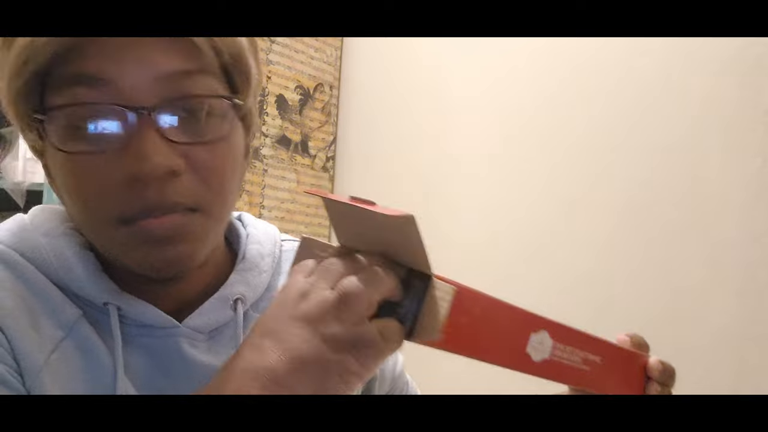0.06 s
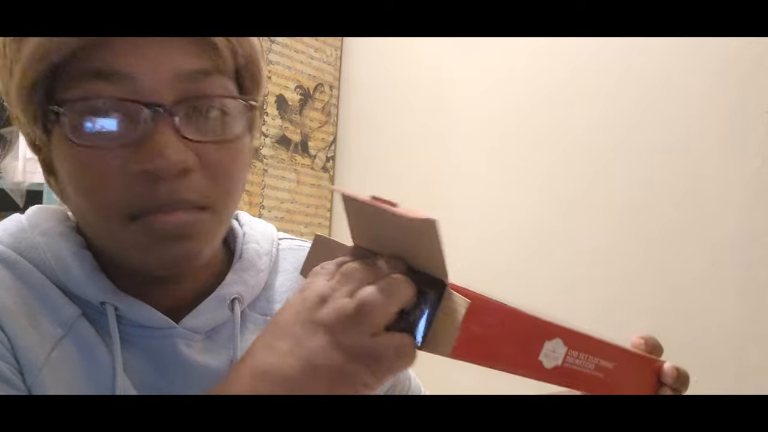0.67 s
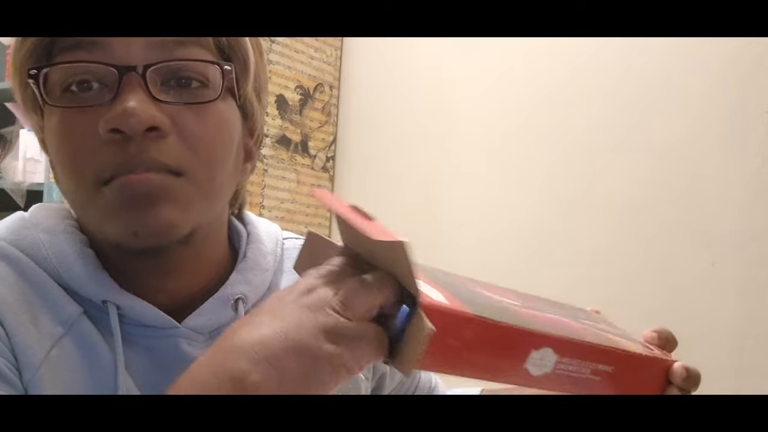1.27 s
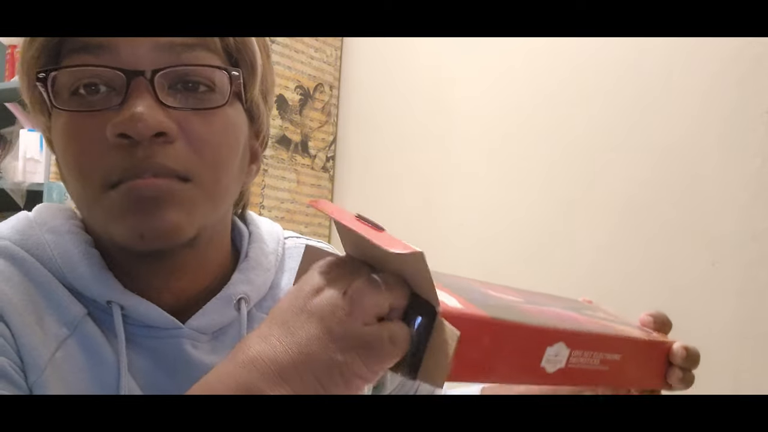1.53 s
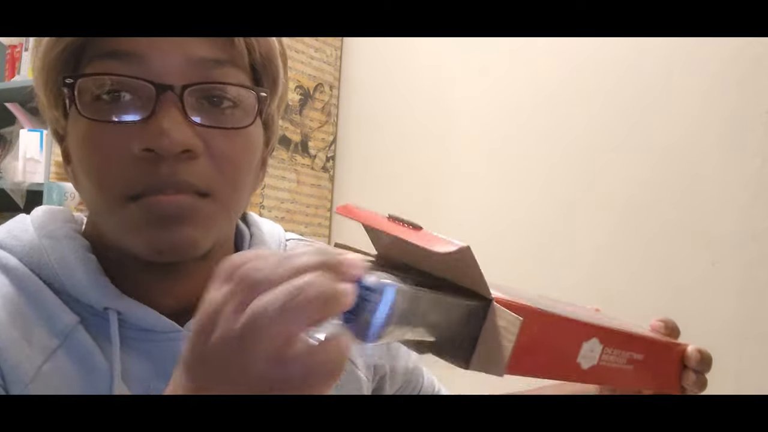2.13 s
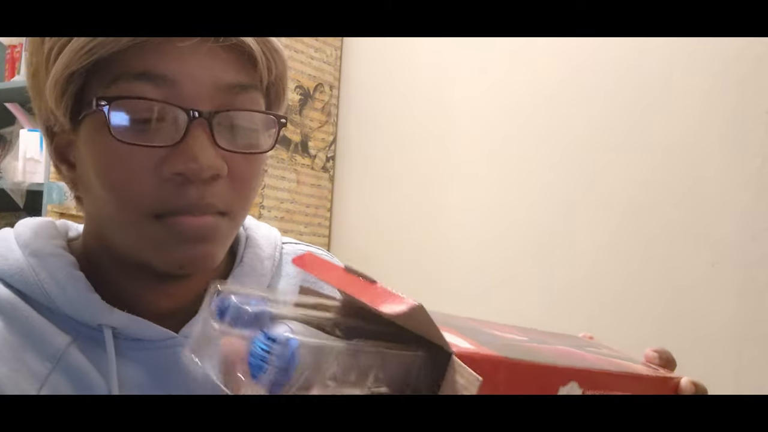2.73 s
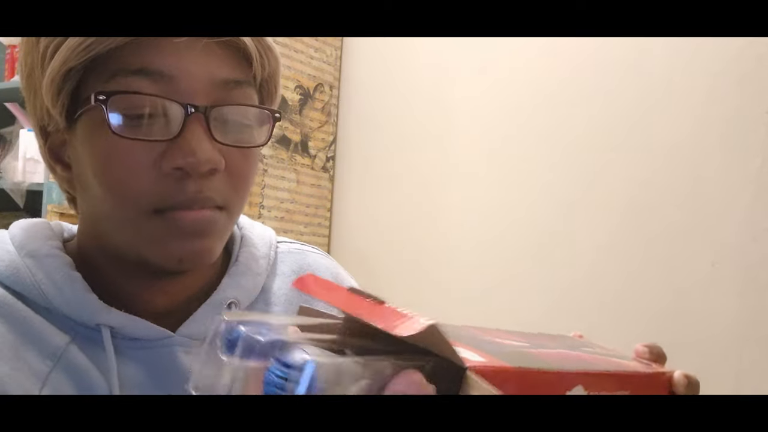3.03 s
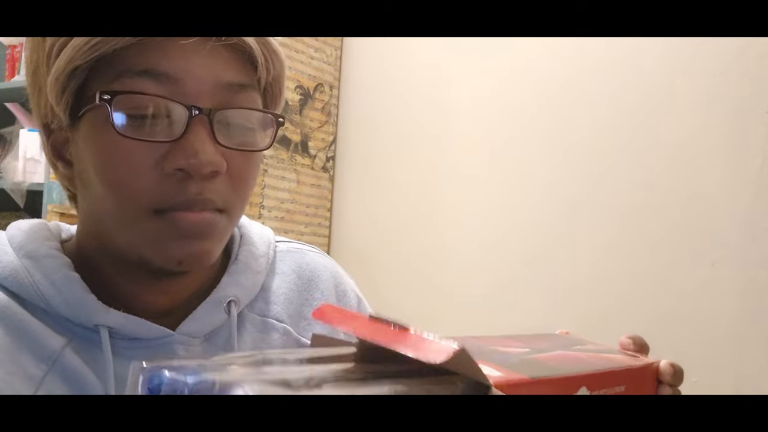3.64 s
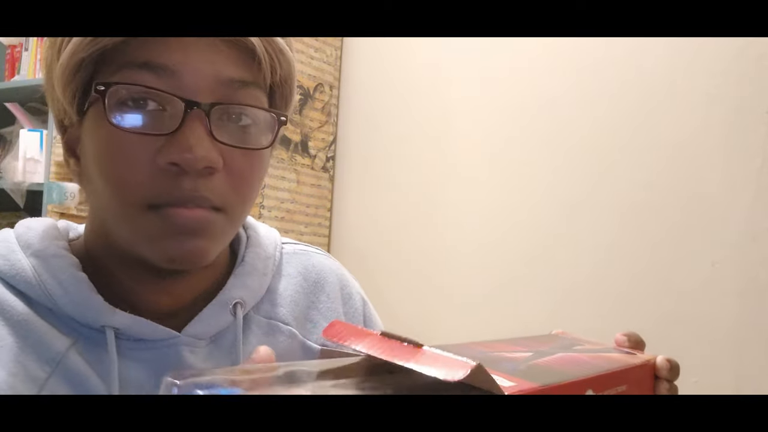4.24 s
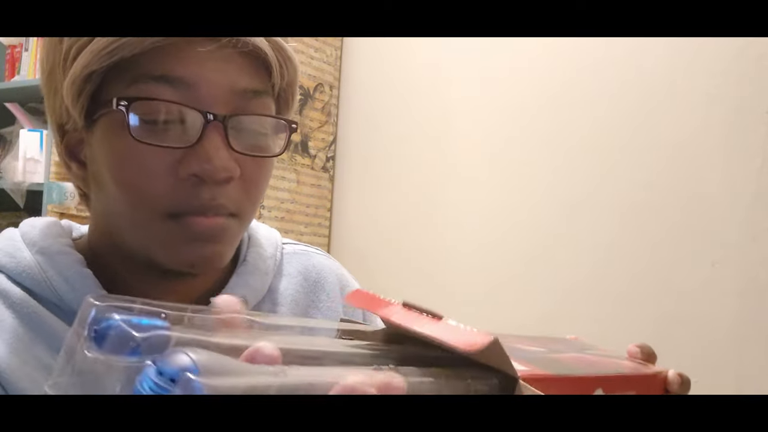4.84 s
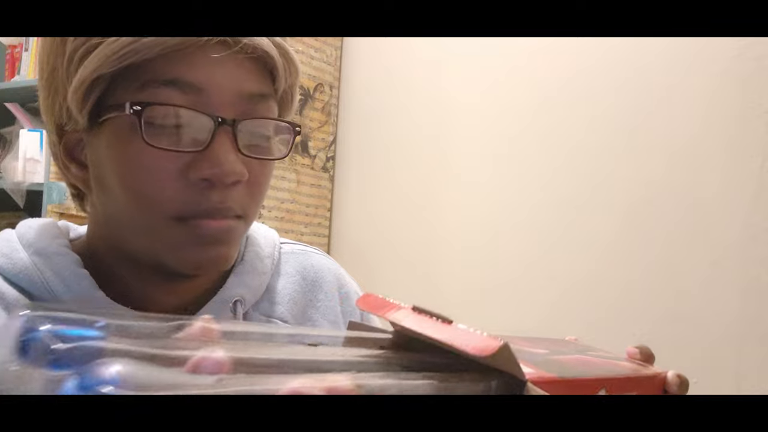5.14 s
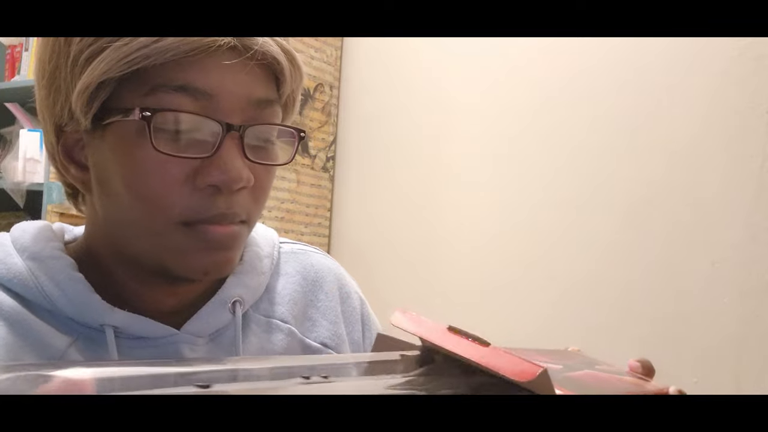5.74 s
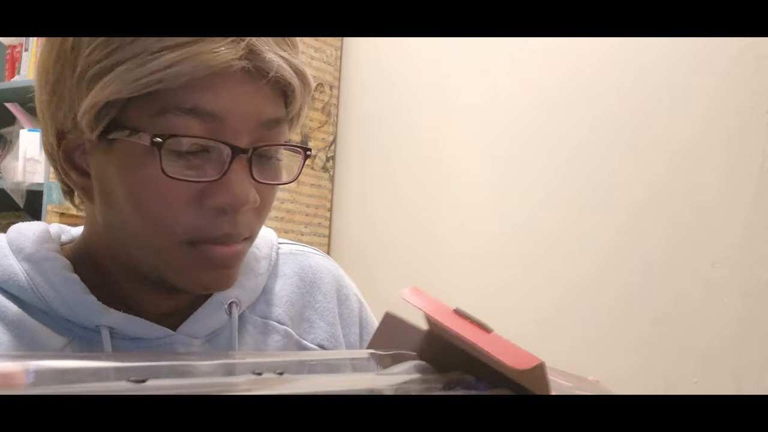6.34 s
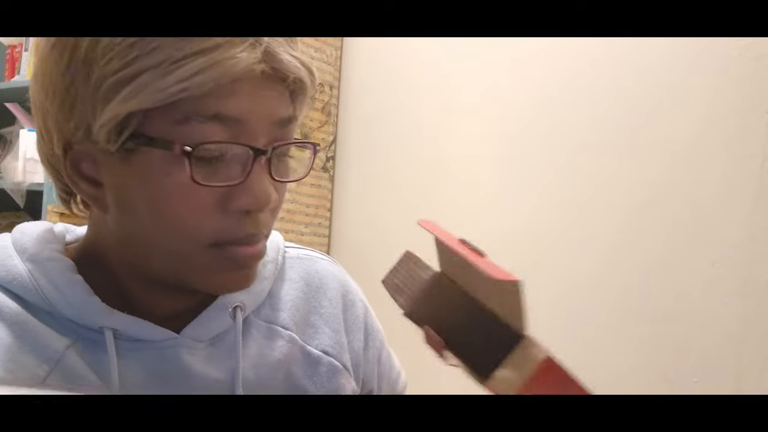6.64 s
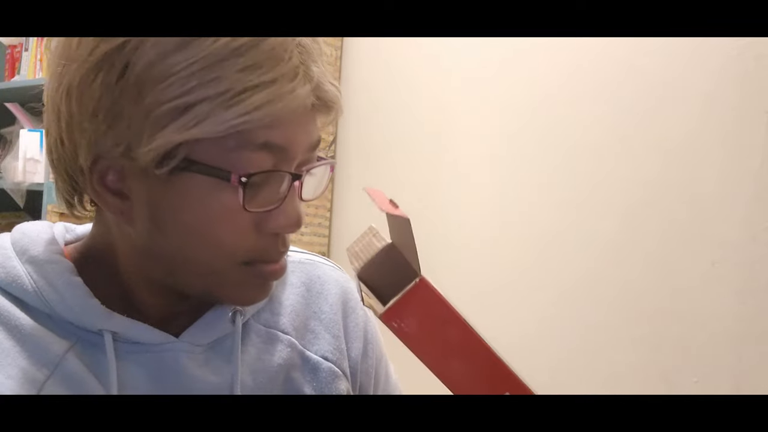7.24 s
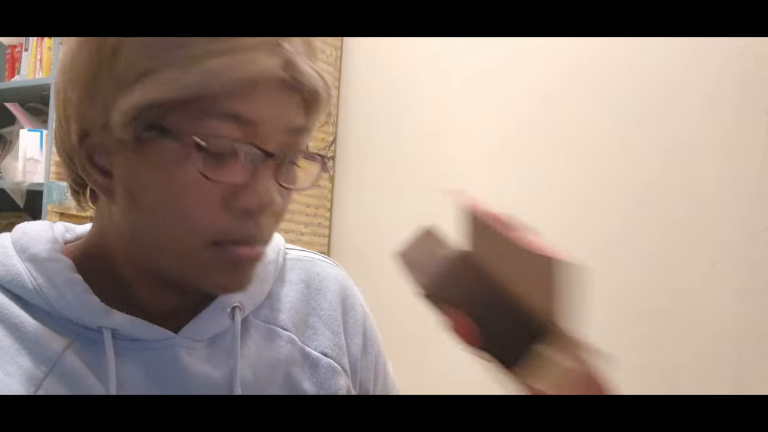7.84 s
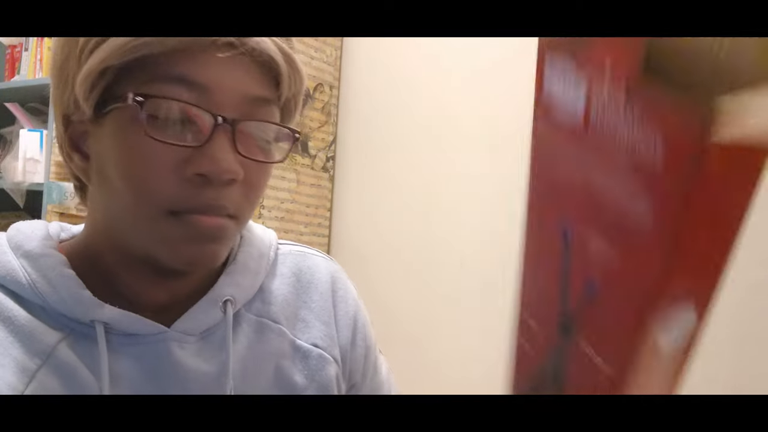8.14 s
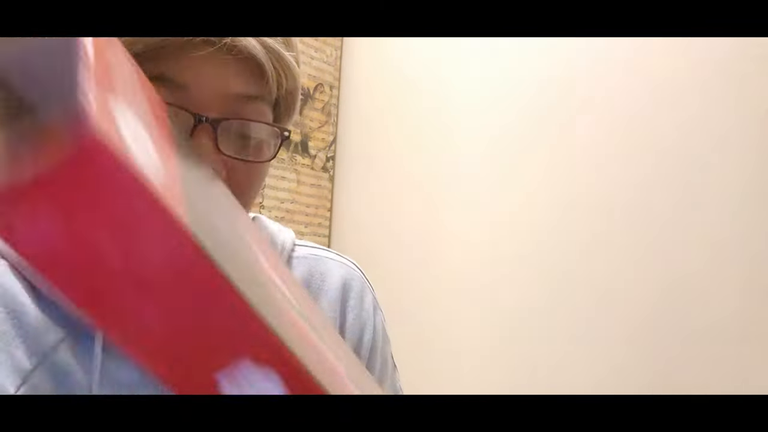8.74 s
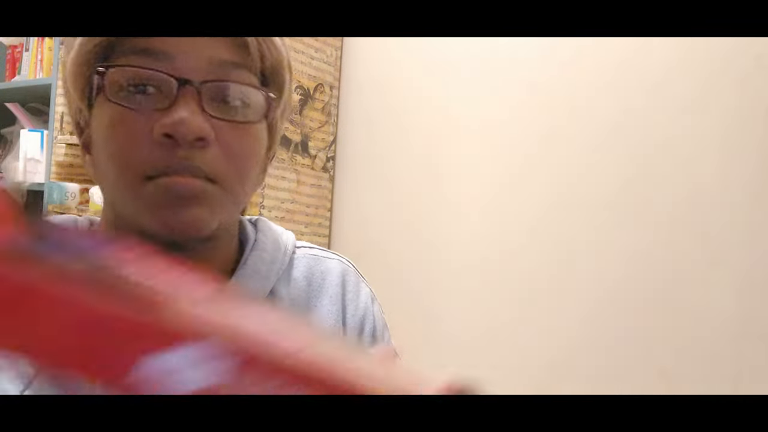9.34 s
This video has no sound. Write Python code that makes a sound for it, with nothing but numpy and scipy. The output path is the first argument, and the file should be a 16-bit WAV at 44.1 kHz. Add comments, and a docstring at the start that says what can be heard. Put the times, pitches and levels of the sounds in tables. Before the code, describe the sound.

A thin plastic tray crinkles, snaps and scrapes as it is tugged out of a cardboard box, then the empty box is handled.

```python
"""A thin plastic tray snaps and crinkles as fingers work it out of a long cardboard box, close up.
Buckling creases crack, ring the plastic and thud in the hollow box. Short tugs scrape the tray along
the card, a caught edge squeals hoarsely, and one long pull draws it free. After a pause the empty box
is handled again and rings faintly under the taps. A small room adds a short echo and a low rumble."""
import sys
import numpy as np
from scipy import signal
from scipy.fft import rfft, irfft
from scipy.io import wavfile
from scipy.ndimage import uniform_filter1d, map_coordinates

SR = 44100
rng = np.random.default_rng(int(sys.argv[2]) if len(sys.argv) > 2 else 0)


def master(y):
    """Save y as 16-bit WAV."""
    cut = np.clip(np.atleast_2d(y).T, -1, 1)
    pcm = np.round(cut * 32767)  # scale
    wavfile.write(sys.argv[1], SR, pcm.astype(np.int16))


N = 418950

# Room tone colour: freq_hz, gain_db
ROOM_TONE_EQ = [(15, -27), (36, -1.5), (65, -3.5), (100, 3.5), (150, -13), (300, -23.5), (600, -34.5),
                (1000, -32.5), (1700, -42.5), (4700, -35.5), (5900, -50), (7300, -35), (8900, -59),
                (16000, -55)]
# Decay of the room: freq_hz, t60_s
ROOM_DECAY = [(150, 0.12), (1400, 0.12), (12000, 0.11)]
# Where the packaging sits in the stereo image: time_s, left_lead_samples, left_over_right_db
PAN_PATH = [(0, 6.5, 4), (4, 6, 3.5), (5.2, 6.5, 4.5), (6.2, 6, 5), (6.6, -8, 2.5), (8.2, -1.5, 2.5),
            (8.8, 6.5, 2.5)]
# Extra lean of each band to one side: freq_hz, left_over_right_db
PAN_BY_BAND = [(100, -1.5), (500, -3.5), (1000, -2), (2000, 0), (4000, -2), (8000, -4.5), (12000, -9.5)]
# The top octave beams, brightest when the plastic faces the listener: time_s, treble_db
FACING_TREBLE = [(1.6, -2.5), (2.2, -2), (3.1, 1), (4.1, -0.5), (5.2, -1), (6.4, 1), (6.62, -8), (6.74, -3),
                 (7.0, -25.5), (8.4, 3.5), (9.2, -8)]

# Short tugs and shifts of grip: start_s, length_s, scrape_db, box_db, crinkle_db
SHORT_TUGS = [(0.0, 0.059, -51, -54.5, -59.5), (0.18, 0.13, -52, -64, -62), (0.44, 0.072, -62.5, -65, -82),
              (0.568, 0.13, -54.5, -65, -54.5), (0.82, 0.062, -53.5, -57, -55.5),
              (0.977, 0.063, -64, -59.5, -73), (1.132, 0.06, -57.5, -59, -72),
              (1.274, 0.51, -57, -62.5, -62), (1.514, 0.069, -42.5, -64, -51),
              (1.578, 0.069, -43.5, -49, -49), (1.819, 0.27, -40, -53, -56),
              (1.859, 0.072, -44, -52, -44.5), (2.15, 0.19, -40, -53, -56.5),
              (2.365, 0.14, -88, -56.5, -83), (2.516, 0.043, -45.5, -54.5, -42.5),
              (2.671, 0.04, -46.5, -65, -54), (2.781, 0.083, -50.5, -55.5, -64),
              (2.91, 0.13, -51.5, -59, -57.5), (3.077, 0.14, -46, -64, -51.5),
              (3.234, 0.19, -40, -57.5, -51.5), (3.453, 0.16, -47, -64, -51.5), (3.85, 0.12, -52, -59, -54),
              (3.94, 0.083, -44, -58, -48.5), (4.048, 0.16, -52.5, -64, -57), (4.153, 0.033, -42, -46, -61),
              (4.283, 0.032, -44.5, -45.5, -54), (4.572, 0.4, -43.5, -57, -54.5),
              (4.581, 0.027, -36, -47, -40), (4.809, 0.09, -39, -57.5, -52.5),
              (6.141, 0.021, -46.5, -49, -60), (6.285, 0.024, -55.5, -55.5, -88),
              (6.354, 0.1, -52.5, -60.5, -57), (6.534, 0.12, -57.5, -73, -59),
              (8.429, 0.053, -50.5, -73, -64), (8.499, 0.11, -41.5, -48.5, -54),
              (8.625, 0.06, -55, -61, -62), (8.731, 0.066, -41.5, -52.5, -50),
              (8.864, 0.073, -46.5, -49.5, -56), (9.049, 0.18, -61.5, -67, -70.5),
              (9.22, 0.08, -58, -88, -63)]
# The long pull that frees the tray, slowing as it goes: time_s, scrape_db
LONG_PULL = [(5.04, -60), (5.09, -42.5), (5.18, -40), (5.42, -43.5), (5.66, -47.5), (5.70, -51),
             (5.75, -45.5), (5.81, -54), (6.04, -50), (6.12, -63)]
# Faint rustle of the fingers holding on: time_s, level_db
FINGER_RUSTLE = [(0, -68.5), (1.25, -67.5), (1.7, -62), (3.75, -60), (4.5, -57.5), (6.7, -71),
                 (6.95, -83.5), (7.6, -86.5), (8.2, -74.5), (8.7, -55.5), (9.05, -82), (9.5, -69)]
# Colour of plastic scraping on card: freq_hz, gain_db
SCRAPE_EQ = [(60, -33), (150, -12), (250, -19), (430, 0.5), (600, -4), (820, 1), (1150, 1), (1600, 0),
             (2100, 4), (3200, -1.5), (4300, -4.5), (5500, -6.5), (7300, -18), (9000, -48)]
# Pitch of the scrape, set by the free length of plastic: time_s, pitch_hz
SCRAPE_PITCH = [(1.95, 2280), (2.25, 1530), (2.95, 2980), (3.3, 1590), (4.0, 2080), (4.6, 3440),
                (4.8, 2070), (5.13, 2100), (5.25, 2470), (5.40, 2950), (5.48, 930), (5.62, 880),
                (5.75, 1620), (6.0, 2195), (8.5, 1030), (8.9, 1350)]
# Hollow hum of the rubbed box: freq_hz, gain_db
BOX_HUM_EQ = [(60, -28.5), (160, -2), (240, -8.5), (310, -3), (430, -1), (600, -18), (800, -3),
              (1600, -70.5)]
# Fine crinkle of the thin film: freq_hz, gain_db
CRINKLE_EQ = [(2000, -56), (3800, 5), (4800, 5), (5700, 3), (7500, 1), (8400, -8), (9500, -15),
              (11800, -7.5), (14000, -18), (16000, -28)]
# Peaks and dips that colour the scrapes and snaps until the tray is free: centre_hz, width_hz, gain_db
COLOUR_BANDS = [(870, 450, 1), (1267, 34, -1.5), (1397, 99, 4.5), (2003, 84, 2.5), (2320, 70, -8),
                (2470, 85, -1.5), (3220, 220, 6.5), (4880, 460, -2.5)]

# Featured snaps and taps: start_s, panel_db, pitch_hz, thud_db, crack_db
SNAP_CUES = [(0.028, -48.5, 2200, -68, -66), (0.084, -54, 2300, -74, -57.5),
             (0.381, -54.5, 2600, -76, -63.5), (0.495, -56, 4400, -79, -59), (1.093, -55.5, 1840, -76, -87),
             (1.161, -54, 2500, -70, -74), (0.1868, -45.5, 1150, -73, -62), (0.2036, -45, 1210, -59, -60),
             (0.2424, -43.5, 2540, -44, -47), (0.258, -46, 1350, -51.5, -43.5),
             (0.305, -45, 2230, -75, -62), (0.3575, -53.5, 1400, -60, -79), (0.543, -55.5, 3120, -63, -63),
             (0.5847, -56, 3020, -74, -57), (0.657, -43.5, 2750, -57, -42.5),
             (0.8043, -47, 1610, -57.5, -78), (1.0284, -51.5, 3130, -85, -64),
             (0.666, -44.5, 2280, -79, -41.5), (0.761, -43.5, 2200, -77, -45.5),
             (0.8433, -47, 1340, -45.5, -45.5), (0.8606, -38, 2580, -44.5, -51),
             (0.9129, -45, 3460, -76, -47), (1.133, -49, 2060, -77, -83), (1.3803, -50.5, 2010, -57, -65),
             (1.5137, -41, 3540, -75, -51), (1.533, -41.5, 2240, -38, -53), (1.5407, -39, 1890, -47, -42),
             (1.584, -38.5, 1620, -45, -43.5), (1.6054, -35.5, 1860, -47, -59),
             (1.6394, -35.5, 1900, -66, -39), (1.6206, -47, 1940, -53, -39.5),
             (1.628, -44, 2580, -62, -37.5), (1.75, -53, 1963, -78, -65), (1.846, -38.5, 3270, -48, -36),
             (1.9028, -25.5, 2250, -42, -36), (1.8876, -37.5, 1670, -41.5, -50.5),
             (1.916, -32.5, 1610, -62, -41.5), (2.0081, -32.5, 2470, -49.5, -39),
             (2.0295, -34, 1790, -41.5, -49), (2.044, -27.5, 2650, -67, -41.5),
             (2.0695, -33.5, 1540, -49, -48), (2.3205, -36.5, 1490, -49, -71),
             (2.4316, -50.5, 2630, -66.5, -54), (2.5323, -47, 3720, -50, -39),
             (2.467, -77, 1000, -57.5, -85), (2.56, -42.5, 3520, -75, -48), (2.715, -43, 1160, -47, -72),
             (2.828, -43, 1650, -68, -77), (2.9005, -44.5, 2610, -56, -53), (2.596, -45.5, 2635, -56, -53),
             (2.635, -49, 1840, -51.5, -78), (2.803, -50, 1740, -74, -68), (3.019, -46, 1950, -67, -61),
             (3.032, -48.5, 3650, -53.5, -66), (3.224, -41.5, 2300, -47, -70),
             (3.431, -48, 3620, -51.5, -44.5), (3.588, -42, 3090, -46, -53), (3.648, -42.5, 2620, -64, -57),
             (4.113, -46, 2170, -61, -52), (4.138, -46, 2330, -55, -53), (4.176, -57, 1970, -57, -55),
             (4.241, -46.5, 2780, -70, -67.5), (4.252, -45.5, 1630, -49.5, -60),
             (4.546, -41, 2150, -58, -59), (2.931, -43, 2950, -73, -69), (3.105, -40, 2860, -47.5, -47.5),
             (3.1463, -36.5, 2170, -40.5, -33.5), (3.388, -39.5, 1730, -62.5, -56.5),
             (3.4852, -29, 2360, -46, -32.5), (3.56, -39.5, 3030, -63, -55), (3.579, -39, 2560, -53, -48),
             (3.629, -35, 1700, -38, -65), (3.663, -40, 3140, -69, -41), (3.8672, -44, 2480, -78, -42),
             (3.973, -43.5, 2000, -65, -45.5), (4.0198, -40.5, 2800, -71, -49),
             (4.062, -44.5, 2300, -64, -54), (4.1, -37, 1800, -68, -51),
             (4.1185, -36.5, 2270, -51.5, -45.5), (4.201, -43, 2440, -74, -77),
             (4.3057, -44, 2510, -48.5, -35), (4.398, -38, 1860, -57, -56), (4.4157, -37.5, 2460, -48, -55),
             (4.5532, -36.5, 1875, -39.5, -57), (4.6174, -31, 3490, -60, -48), (4.68, -41, 1080, -41, -55),
             (4.7173, -33.5, 2570, -46, -58), (4.56, -38, 1500, -46.5, -63), (4.593, -47, 950, -31, -57.5),
             (4.881, -39.5, 1200, -54.5, -48), (4.73, -35, 1635, -43.5, -51),
             (4.8678, -27.5, 2350, -47, -34.5), (4.9554, -42, 2130, -37.5, -43),
             (5.055, -32.5, 3300, -74, -52), (5.406, -42.5, 2200, -61, -55), (5.561, -54, 3000, -67, -49),
             (5.9307, -44, 2010, -57, -56), (6.091, -48, 2480, -57.5, -74), (5.85, -52.5, 3200, -59, -64),
             (6.04, -48, 2820, -56.5, -78), (6.148, -59, 1510, -66, -56.5),
             (6.474, -67, 4000, -59.5, -50.5), (6.166, -48.5, 1550, -52, -56),
             (6.431, -48.5, 1970, -53, -57), (6.5617, -40, 2900, -50, -46), (6.573, -48, 1000, -50, -72),
             (6.6201, -40, 1450, -72, -68), (6.635, -39.5, 2420, -70, -47), (6.616, -40, 3000, -68, -58),
             (6.736, -60, 2500, -83, -53.5), (6.804, -63, 3060, -82, -70), (7.03, -79, 997, -66.5, -95),
             (8.287, -60, 1000, -85, -85), (8.957, -55.5, 800, -50, -74), (9.093, -54, 2900, -71, -74),
             (6.695, -44.5, 2050, -86, -56), (6.8186, -48.5, 2010, -68, -60),
             (7.691, -55.5, 1080, -60.5, -94.5), (7.842, -56, 1480, -93, -95), (7.953, -47, 3120, -70, -53),
             (8.1483, -49.5, 1460, -86, -73), (8.2363, -50, 2200, -57.5, -49.5),
             (8.214, -57, 3070, -80, -63), (8.349, -55, 2380, -84, -71), (8.4505, -45.5, 2170, -69, -46.5),
             (8.493, -46, 1070, -57, -74), (8.5056, -38, 1800, -53, -74), (8.5443, -40, 1090, -69, -55),
             (8.5752, -36.5, 2070, -49, -39.5), (8.734, -43, 3290, -77, -43.5),
             (8.772, -37.5, 1640, -33.5, -55), (8.781, -46, 1210, -41, -66),
             (8.7929, -38.5, 1580, -60, -52), (8.8872, -37.5, 3360, -67, -41.5),
             (8.917, -36.5, 3070, -69, -45), (9.075, -48.5, 1100, -55, -75), (9.1647, -50, 1680, -58, -65),
             (9.2455, -45.5, 1740, -80, -47.5), (9.289, -41.5, 1510, -82, -60)]
# Broad knock of a tapped box wall: freq_hz, gain_db
KNOCK_EQ = [(130, -10), (290, -5), (440, -1), (720, -0.5), (950, -1), (1700, -47)]
# Hollow note of a tap, set by the span of card between the fingers: time_s, pitch_hz
WALL_PITCH = [(0.24, 413), (0.27, 790), (0.85, 735), (1.53, 517), (2.03, 407), (2.47, 317), (2.72, 430),
              (3.63, 417), (4.3, 750), (4.56, 415), (4.68, 397), (4.95, 452), (6.57, 406), (7.69, 718),
              (8.77, 418), (8.96, 536)]
# Brittle crack of a crease: freq_hz, gain_db
CRACK_EQ = [(2000, -50), (3800, 5.5), (5700, 6.5), (7400, 3), (8500, -4.5), (9300, -9.5), (11000, -7.5),
            (13000, -9.5), (16000, -23)]
# The whole box is bumped or caught: start_s, level_db
BUMP_CUES = [(1.534, -65), (1.889, -45), (2.533, -47), (4.557, -62), (4.681, -46.5), (6.571, -43.5),
             (8.512, -43.5), (8.778, -43.5)]
# Low body of a bump: freq_hz, gain_db
BUMP_EQ = [(20, -38), (45, -9.5), (85, 5), (220, -0.5), (330, -7.5), (700, -53.5)]
# A tray edge catches on the card: start_s, length_s, first_hz, last_hz, level_db
SQUEAL_CUES = [(1.98, 0.09, 2305, 2270, -42), (4.765, 0.18, 2110, 2000, -47),
               (5.066, 0.18, 2170, 1980, -48.5), (5.082, 0.079, 479, 410, -56.5),
               (5.1, 0.2, 2696, 2490, -48), (5.268, 0.18, 2500, 2660, -51), (5.31, 0.12, 3000, 3130, -51.5),
               (5.434, 0.26, 3234, 3140, -54), (5.44, 0.2, 930, 860, -54.5),
               (5.698, 0.067, 1296, 1520, -52), (5.973, 0.1, 1015, 840, -58)]
# Modes of the empty box: pitch_hz, gain_db, t60_s
EMPTY_BOX_MODES = [(507, 8, 0.12), (737, 9, 0.14), (773, -5, 0.094), (1032, 10, 0.1), (1100, 8, 0.21),
                   (1340, -8, 0.09), (1725, -17, 0.073)]

TRAY_FREE_S = 6.9  # from here on the box rings empty and the colour bands drop out
PANEL_HZ, PANEL_T60_MS = 2203, 21  # a typical patch of plastic; lower patches ring longer
HIT_SAMPLES = 4096
HIT_FREQS = np.fft.rfftfreq(HIT_SAMPLES, 1 / SR)


def amp(db):
    """Decibels to gain."""
    return 10 ** (np.asarray(db) / 20)


def unit_rms(x):
    """Scales to rms 1."""
    return x / np.sqrt(np.mean(x ** 2) + 1e-30)


def curve_at(points, hz):
    """Reads a spectrum table on a log-frequency axis."""
    freqs, values = np.transpose(points)
    return np.interp(np.log(hz + 1), np.log(np.sort(freqs) + 1), values)


def follow(rows, t):
    """The columns of an automation table at times t."""
    times, *columns = np.transpose(rows)
    return [np.interp(t, times, column) for column in columns]


def add(mix, start, sound):
    """Mixes a stereo sound in at start seconds."""
    part = mix[:, max(round(start * SR), 0):][:, :sound.shape[1]]
    part += sound[:, :part.shape[1]]


def blend(shared, other, likeness):
    """A second channel that resembles the first by a likeness of 0 to 1."""
    return likeness * shared + np.sqrt(1 - likeness ** 2) * other


def body_response(db):
    """Minimum-phase response of a body with this gain curve: sharp start, ringing after."""
    log_gain = np.log(amp(np.maximum(db, db.max() - 80)))
    mirrored = np.concatenate([log_gain, log_gain[-2:0:-1]])
    return np.exp(np.conj(signal.hilbert(mirrored)))[:len(db)]


def ripple(hz, spots, bands=64):
    """Random resonant peaks and dips, wider towards the treble: one column per contact spot."""
    band = np.log1p(hz / 700) / np.log1p(SR / 2 / 700) * (bands - 1)
    grid = np.meshgrid(band, np.arange(spots), indexing="ij")
    return unit_rms(map_coordinates(rng.standard_normal((bands, spots)), grid, order=1, mode="nearest"))


def pan(shared, other, hz, t, likeness, bass_hz=650, beam_hz=9500):
    """Places the packaging in stereo: alike in the bass, wider above, earlier on the nearer side."""
    lead, side_db = follow(PAN_PATH, t)
    alike = 1 - (1 - likeness) * hz ** 2 / (hz ** 2 + bass_hz ** 2)
    side = amp((side_db + curve_at(PAN_BY_BAND, hz)) / 2)
    sample_delay = -2j * np.pi * hz / SR
    left = shared * side * np.exp(sample_delay * np.maximum(-lead, 0))
    right = blend(shared, other, alike) / side * np.exp(sample_delay * np.maximum(lead, 0))
    top_octave = 1 / (1 + (beam_hz / (hz + 1)) ** 10)
    return np.array([left, right]) * amp(follow(FACING_TREBLE, t)[0] * top_octave)


def room_tone(level_db=-61.5, bass_hz=600):
    """A steady bed of low rumble under a faint, wide hiss."""
    hz = np.fft.rfftfreq(N, 1 / SR)
    left, other = rfft(rng.standard_normal((2, N))) * amp(curve_at(ROOM_TONE_EQ, hz))
    right = blend(left, other, 0.98 / (1 + (hz / bass_hz) ** 2))
    return amp(level_db) * unit_rms(irfft([left, right], N))


def reflections(predelay_s=0.006, echoes_per_s=3000, bass_hz=450):
    """Impulse response of a small furnished room: scattered echoes that die quickly."""
    taps = rng.standard_normal((2, SR // 2)) * (rng.random((2, SR // 2)) < echoes_per_s / SR)
    taps[:, :int(predelay_s * SR)] = 0
    hz, t, bands = signal.stft(taps, SR, nperseg=256)
    likeness = 1 / (1 + (hz[:, None] / bass_hz) ** 2)  # long waves reach both sides alike
    bands[1] = blend(*bands, likeness)
    tail = signal.istft(bands * amp(-60 * t / curve_at(ROOM_DECAY, hz)[:, None]), SR)[1]
    return tail / np.linalg.norm(tail, axis=1, keepdims=True)


def room_echo(x, wet_db=-10, swaps_per_s=1.606):
    """Two echo patterns crossfade, so the room drifts as box and arms move."""
    angle = np.pi * swaps_per_s * np.arange(N) / SR
    sends = x * np.cos(angle), x * np.sin(angle)
    return amp(wet_db) * sum(signal.fftconvolve(send, reflections(), axes=1)[:, :N] for send in sends)


def rub_levels(attack_s=0.02, sag_db=2.5, release_db_per_s=279):
    """Pull, grip and tugs summed into automation rows: time_s, scrape_db, box_db, crinkle_db."""
    t = np.arange(0, N, 64) / SR
    pull = amp(follow(LONG_PULL, t)[0]) * (t > LONG_PULL[0][0]) * (t < LONG_PULL[-1][0])
    grip = amp(follow(FINGER_RUSTLE, t)[0])
    power = np.outer(pull, amp([0, -21.5, -16.5])) ** 2  # balance of scrape, box and crinkle
    power += np.outer(grip, amp([0, -9, -10.5])) ** 2
    for start, length, *levels_db in SHORT_TUGS:  # each takes hold, eases off and dies away
        age = t - start
        fall_db = sag_db * np.clip(age / length, 0, 1) + release_db_per_s * np.maximum(age - length, 0)
        envelope = np.clip(age / attack_s, 0, 1) * amp(-fall_db)
        power += np.outer(envelope, amp(levels_db)) ** 2
    return np.column_stack([t, 10 * np.log10(power)])


def colour_eq(hz, t):
    """Peaks and dips in dB that colour the scrapes and snaps until the tray is free."""
    bend = (follow(SCRAPE_PITCH, t)[0] / PANEL_HZ) ** 0.053  # they follow the scrape's pitch a little
    bells = (db / (1 + (2 * (hz / bend - centre) / width) ** 2) for centre, width, db in COLOUR_BANDS)
    return (t < TRAY_FREE_S) * sum(bells)


def friction(eq, level_db, slips_per_s, slip_s, spread_db, smooth, likeness,
             drift_db=2.2, sing_db=0, low_shelf_db=0):
    """Countless tiny slips of uneven size; the resonances drift as the contact point moves."""
    slips = amp(spread_db * np.minimum(rng.exponential(1, N), 4)) * (rng.random(N) < slips_per_s / SR)
    power = signal.lfilter([1], [1, -np.exp(-1 / (slip_s * SR))], slips ** 2)
    grain = rng.standard_normal((2, N)) * np.sqrt(power / power.mean() + smooth)
    hz, t, bands = signal.stft(grain, SR, nperseg=1024)
    drift = unit_rms(uniform_filter1d(ripple(hz, spots=len(t), bands=130), size=10, axis=1))
    octaves = np.log2((hz[:, None] + 1) / follow(SCRAPE_PITCH, t)[0])
    # A peak at the scrape's pitch and a slight lift of the band below it.
    pitch_eq = sing_db * np.exp(-(octaves / 0.27) ** 2) + low_shelf_db * np.clip(-octaves, 0, 1)
    moving_eq = 0.99 * colour_eq(hz[:, None], t) + drift_db * drift + pitch_eq
    bands = bands * body_response(curve_at(eq, hz))[:, None] * amp(moving_eq)
    sound = signal.istft(pan(*bands, hz[:, None], t, likeness), SR)[1][:, :N]
    slow_rms = np.sqrt(uniform_filter1d((sound ** 2).mean(0), size=4000))
    return sound / slow_rms * amp(level_db)  # the hand alone sets the slow level


def sliding():
    """The tray scrapes over card fibres, the box hums hollowly and the film crinkles in short ticks."""
    scrape_db, box_db, crinkle_db = follow(rub_levels(), np.arange(N) / SR)
    scrape = friction(SCRAPE_EQ, scrape_db - 2.5, slips_per_s=300, slip_s=0.0022, spread_db=2.4,
                      smooth=0.5, likeness=0.11, sing_db=1.85, low_shelf_db=1.5)
    hum = friction(BOX_HUM_EQ, box_db, slips_per_s=53, slip_s=0.0049, spread_db=1.5,
                   smooth=0.27, likeness=0.36, drift_db=7)
    crinkle = friction(CRINKLE_EQ, crinkle_db - 0.5, slips_per_s=750, slip_s=0.0018, spread_db=2.5,
                       smooth=0.43, likeness=0.12)
    return scrape + hum + crinkle


def hit(start, eq_db, level_db, t60_ms, tick, likeness, ragged_db=2, ripple_db=3):
    """One sudden push, then a ragged cluster of dying bending waves; each spot has its own colour."""
    t = np.arange(HIT_SAMPLES) / SR
    chatter = unit_rms(uniform_filter1d(rng.standard_normal(HIT_SAMPLES), size=50))
    waves = rng.standard_normal((2, HIT_SAMPLES)) * amp(ragged_db * chatter)
    waves *= amp(-60 * t / (t60_ms / 1000))
    waves /= np.linalg.norm(waves, axis=1, keepdims=True)
    waves[0, 0] += tick * rng.choice([-1, 1])
    spectra = rfft(waves) * body_response(eq_db + ripple_db * ripple(HIT_FREQS, spots=1)[:, 0])
    fade = np.cos(np.pi / 2 * t / t[-1])
    sound = irfft(pan(*spectra, HIT_FREQS, start, likeness)) * fade
    return amp(level_db) * unit_rms(sound) * np.sqrt(0.01 * SR / HIT_SAMPLES)  # as if packed into 10 ms


def panel_eq(pitch_hz, start, low_hz=560, high_hz=5500):
    """A patch of plastic radiates a hump just under its pitch, steep above, with little bass."""
    away = np.log2((HIT_FREQS + 1) / (0.96 * pitch_hz)) / 0.98
    radiated_db = -10 * np.log10(1 + (low_hz / (HIT_FREQS + 1)) ** 6 + (HIT_FREQS / high_hz) ** 10)
    skirt_db = -13 * np.log10(1 + away ** 2 + away ** 4 + 1.7 * np.maximum(away, 0) ** 6)
    return radiated_db + colour_eq(HIT_FREQS, start) + skirt_db


def wall_eq(start, note_db=11, width_octaves=0.2):
    """A tapped box wall gives a hollow note over a broad knock."""
    away = np.log2((HIT_FREQS + 1) / follow(WALL_PITCH, start)[0]) / width_octaves
    return curve_at(KNOCK_EQ, HIT_FREQS) + note_db * np.exp(-away ** 2)


def snaps():
    """A patch of plastic or card buckles: it rings about its own pitch, shakes the box and cracks."""
    out = np.zeros((2, N))
    for start, panel_db, pitch_hz, thud_db, crack_db in SNAP_CUES:
        t60_ms = PANEL_T60_MS * np.sqrt(PANEL_HZ / pitch_hz)
        crack_eq = curve_at(CRACK_EQ, HIT_FREQS) + colour_eq(HIT_FREQS, start)
        panel = hit(start, panel_eq(pitch_hz, start), panel_db, t60_ms, tick=0.5, likeness=0.18)
        thud = hit(start, wall_eq(start), thud_db, t60_ms=54, tick=0.42, likeness=0.073, ripple_db=3.5)
        crack = hit(start, crack_eq, crack_db, t60_ms=18, tick=0.3, likeness=0.17)
        add(out, start, panel + thud + crack)
        if start > TRAY_FREE_S:
            add(out, start, empty_box_ring(panel_db, pitch_hz))
    return out


def crackle(per_s=28, until_s=4.9, spread_db=1.5, centre_hz=2700):
    """Small creases give way, each at its own pitch and riding the rub, until the tray comes loose."""
    out, rub = np.zeros((2, N)), rub_levels()
    for when, softness, octaves in rng.uniform(-1, 1, (int(per_s * until_s), 3)):
        start = abs(when) * until_s
        scrape_db, _, crinkle_db = follow(rub, start)
        level_db = min(max(scrape_db, crinkle_db) - 0.5, -45) - spread_db * softness
        eq_db = panel_eq(centre_hz * 2 ** octaves, start)
        add(out, start, hit(start, eq_db, level_db, t60_ms=35, tick=0.41, likeness=0.58))
    return out


def box_bumps():
    """The whole box is bumped or caught and gives a low, dull thump."""
    out, eq_db = np.zeros((2, N)), curve_at(BUMP_EQ, HIT_FREQS)
    for start, level_db in BUMP_CUES:
        add(out, start, hit(start, eq_db, level_db, t60_ms=140, tick=0.85, likeness=0.84))
    return out


def edge_squeals(width_hz=150, waver=0.009, rough_db=2.5, fade_s=0.014):
    """Uneven stick and slip feeds one narrow resonance of the tray, which glides as the edge moves on."""
    out, t = np.zeros((2, N)), np.arange(SR // 2) / SR
    for start, length, first_hz, last_hz, level_db in SQUEAL_CUES:
        drift = unit_rms(uniform_filter1d(rng.standard_normal(len(t)), size=1200))
        grip = unit_rms(uniform_filter1d(rng.standard_normal(len(t)), size=200))
        hz = np.interp(t, [0, length], [first_hz, last_hz]) * (1 + waver * drift)
        slips = rng.standard_normal((2, len(t))) + 1j * rng.standard_normal((2, len(t)))
        rasp = signal.lfilter(*signal.butter(2, width_hz / 2, fs=SR), slips * amp(rough_db * grip))
        ring = rasp * np.exp(2j * np.pi * np.cumsum(hz) / SR)
        swell = np.clip(np.minimum(t, length - t) / fade_s, 0, 1)
        add(out, start, amp(level_db) * swell * unit_rms(pan(*ring, hz, start, likeness=0.5).real))
    return out


def empty_box_ring(tap_db, tap_hz, reach_octaves=0.75, detune=0.061, attack_s=0.001):
    """The empty box rings faintly after a tap, most at modes near its pitch; each grip detunes them."""
    t = np.arange(SR // 4) / SR
    out = np.zeros((2, len(t)))
    for mode_hz, mode_db, t60_s in EMPTY_BOX_MODES:
        spot, right_phase, grip = rng.uniform(-0.83, 1, 3)
        coupling = np.exp(-(np.log2(mode_hz / tap_hz) / reach_octaves) ** 2)
        onset_db = tap_db - 15 + mode_db - 10 * spot
        wave = np.sin(2 * np.pi * mode_hz * (1 + detune * grip) * t + np.array([[0], [right_phase]]))
        out += coupling * amp(onset_db - 60 * t / t60_s) * wave
    return out * np.minimum(t / attack_s, 1)


def scene():
    """The packaging up front, with its room echo and a bed of room tone."""
    packaging = snaps() + box_bumps() + crackle() + sliding() + edge_squeals()
    return packaging + room_echo(packaging) + room_tone()


def record(dry):
    """A steep high cut at 16 kHz on the whole mix."""
    high_cut = signal.firwin(511, 16000, window=("kaiser", 9), fs=SR)
    return signal.oaconvolve(dry, high_cut[None], "same")


dry = scene()
out = record(dry)
master(out)
```